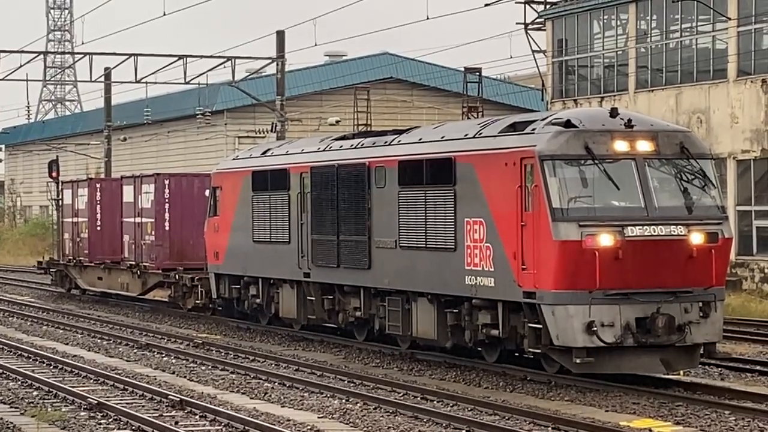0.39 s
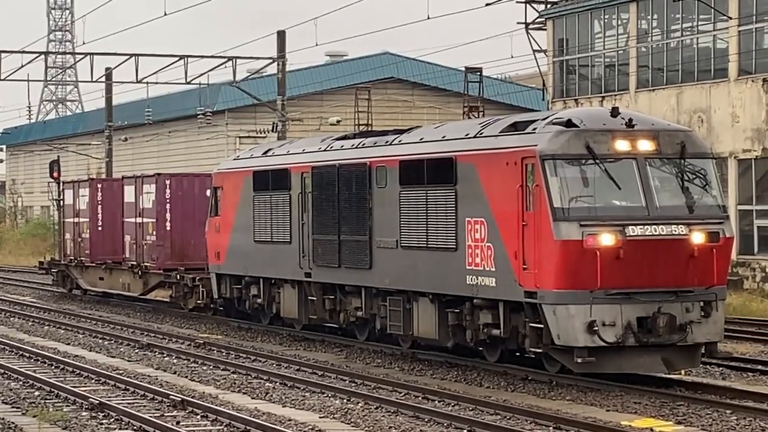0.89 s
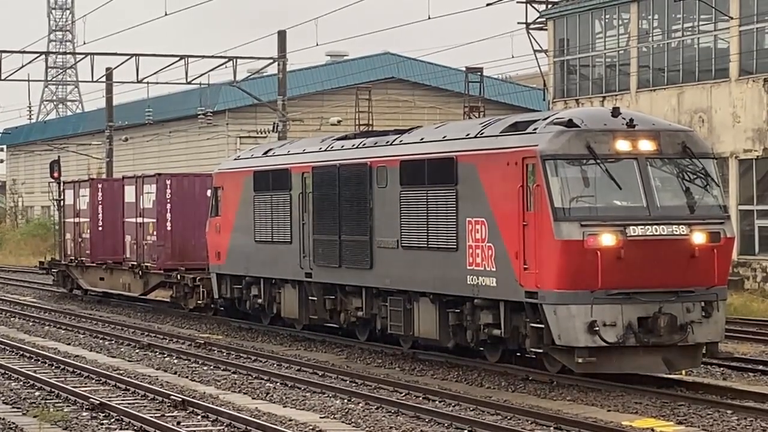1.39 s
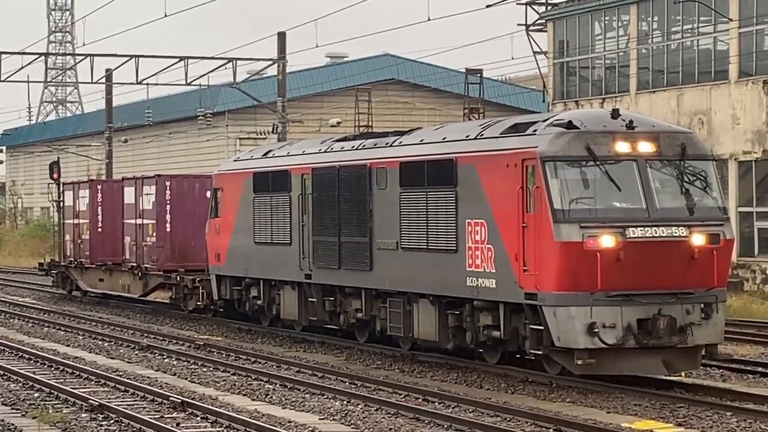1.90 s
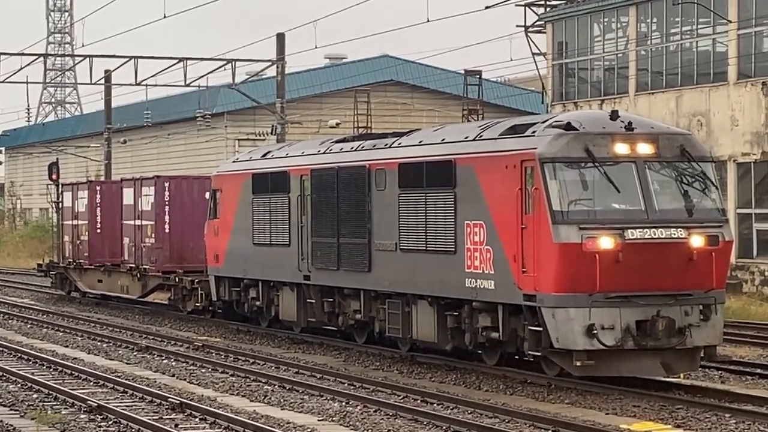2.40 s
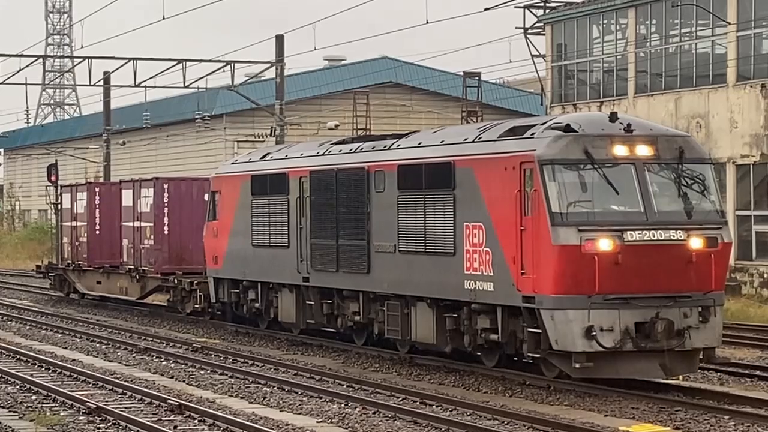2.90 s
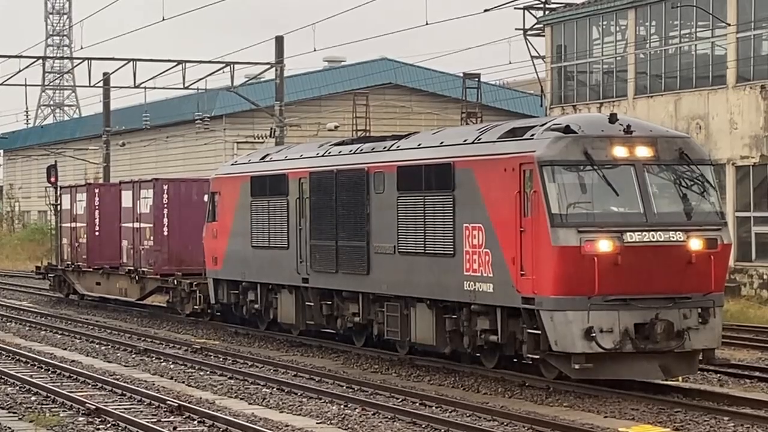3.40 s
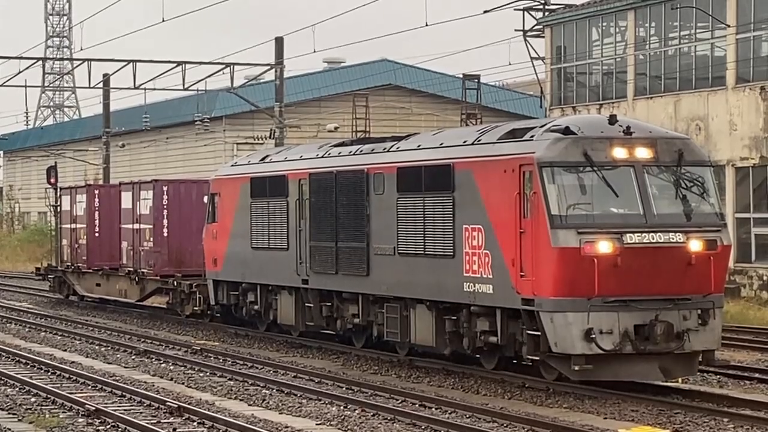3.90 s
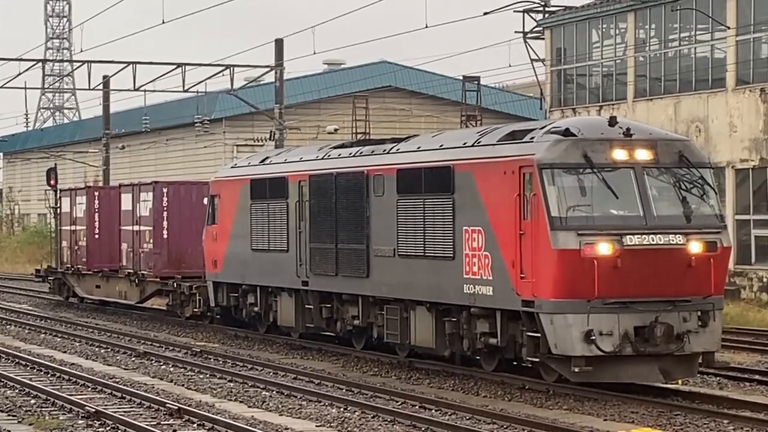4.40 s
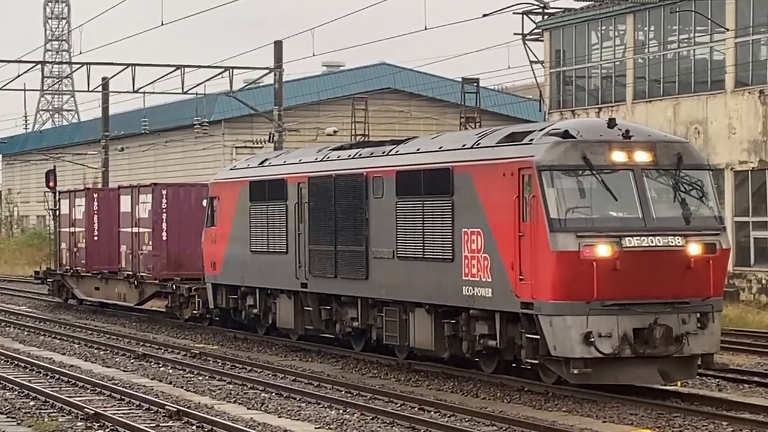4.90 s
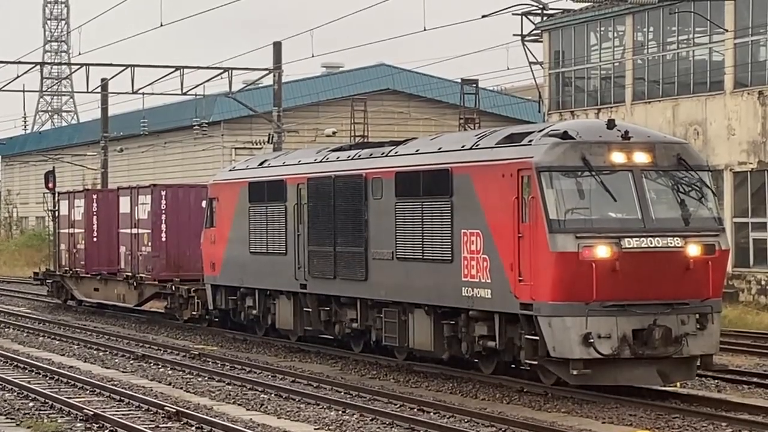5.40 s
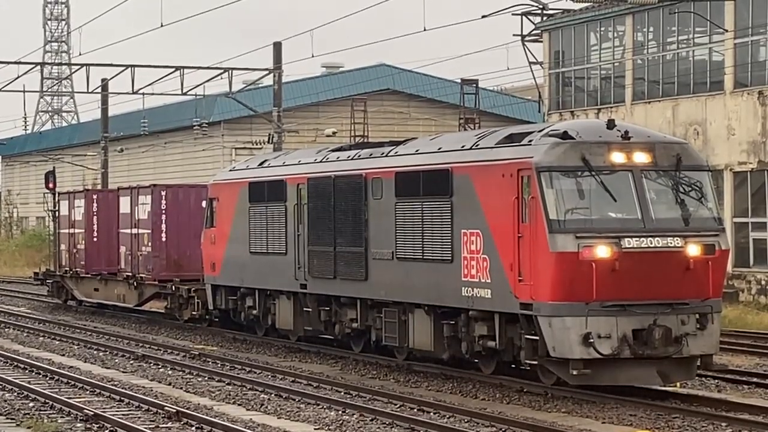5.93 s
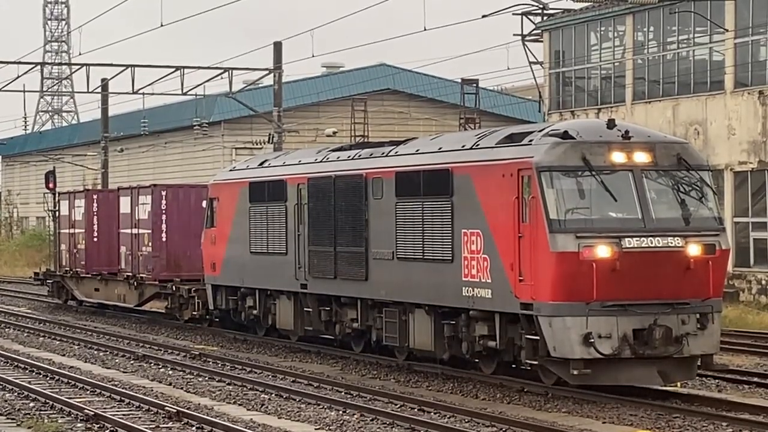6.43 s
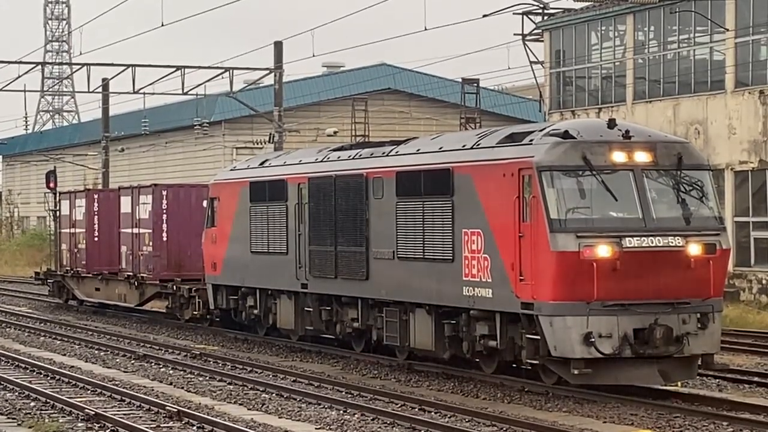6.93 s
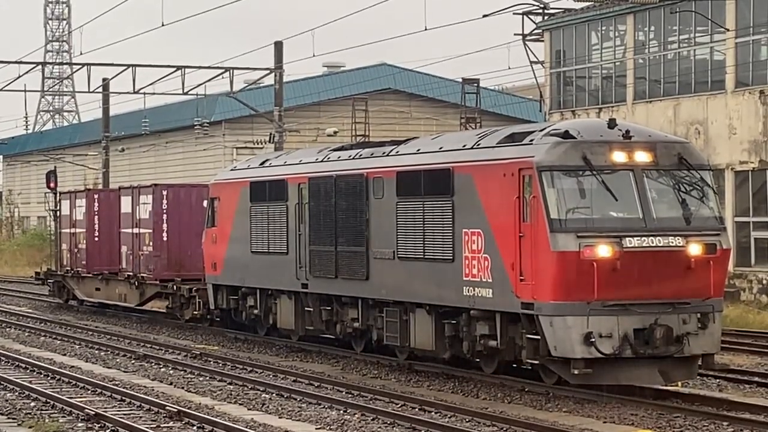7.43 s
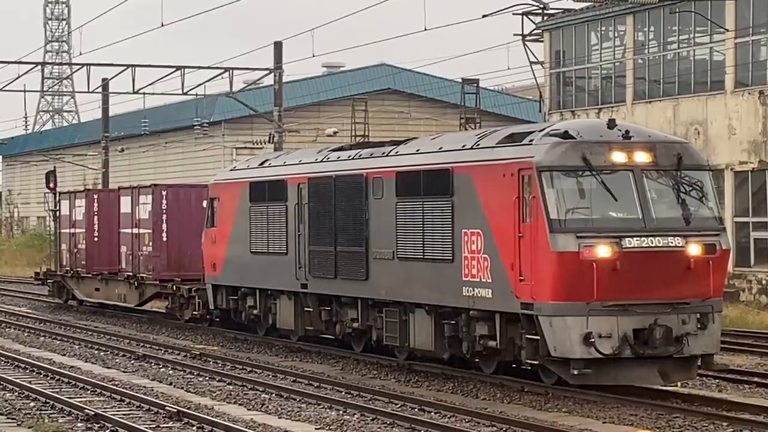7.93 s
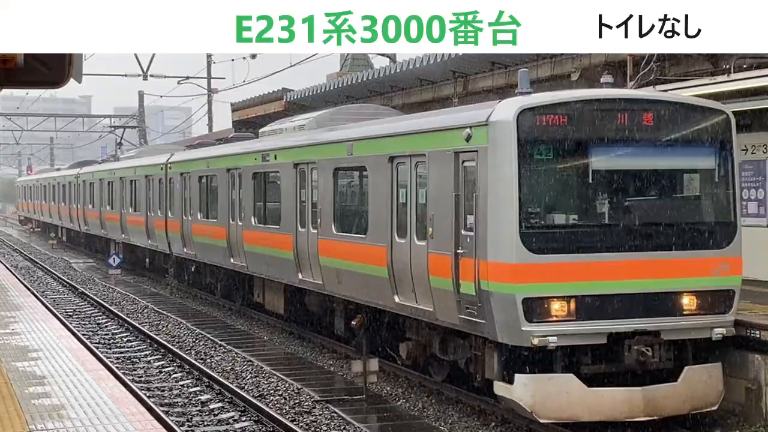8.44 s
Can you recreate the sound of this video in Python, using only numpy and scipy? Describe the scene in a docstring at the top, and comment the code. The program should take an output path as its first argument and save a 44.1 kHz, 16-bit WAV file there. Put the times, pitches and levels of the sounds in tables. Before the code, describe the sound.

From 0 s a large diesel locomotive idles across an open rail yard, already running and never changing speed. Its deep exhaust drone throbs rapidly and evenly, with a rough metallic buzz from the block and quick, slightly uneven valve and injector knocks. Around it are broad fan roar, rushing intake air with a fluttering high whistle, fine hiss and a faint thin whine. Low wind rumble comes and goes, with soft thuds on the small stereo microphone near 0, 0.5 and 1.4 s. A low hum rises around 2 s; from 2.1 to 4 s the roar and air swell modestly, then hold. A midrange growl wanders in pitch and strength throughout. The hum strengthens again near 6.5 s and almost vanishes at 7.7 s. At 8.4 s everything cuts sharply to quiet, steady rain on a platform, with no engine.

```python
"""A twelve-cylinder diesel locomotive idles across a rail yard, heard by a small two-port microphone.
From the start, sines on the engine-cycle orders make exhaust drone and buzz, decaying rings the valve knocks;
wandering narrow noise growls, shaped noise is fan, intake, hiss and wind, and sines give a hum and a whine.
The hum rises near 2 s, roar and air swell from 2.1 to 4 s, and the hum nearly vanishes at 7.7 s.
At 8.4 s the scene cuts to quiet rain on a platform, made of shaped noise."""
import sys
import numpy as np
from scipy import signal
from scipy.fft import rfft, irfft, next_fast_len
from scipy.io import wavfile
from scipy.ndimage import uniform_filter1d, map_coordinates

SR = 44100
rng = np.random.default_rng(int(sys.argv[2]) if len(sys.argv) > 2 else 0)


def decibels_to_gain(level_db):
    """Convert a level in decibels to a linear amplitude gain (20 dB per decade)."""
    exponent = np.asarray(level_db, float) / 20
    return 10 ** exponent


def dump(signal):
    """Clip the signal to [-1, 1] and save it as 16-bit WAV at the path in sys.argv[1]."""
    limited = np.clip(np.atleast_2d(signal).T, -1, 1)
    pcm = np.round(limited * 32767).astype(np.int16)
    wavfile.write(sys.argv[1], SR, pcm)


N = 377496

CYCLE_HZ = 7.0844  # engine cycles a second: a four-stroke at 850 rpm
# Exhaust orders. Each row: multiple of the cycle rate, level in dB rms, left-right balance in dB.
EXHAUST_ORDERS = [(6, -33, -1), (7, -45, -1), (9, -38, -1), (10, -35, -1), (11, -32, -3), (12, -20, -1),
                  (13, -33, -2), (14, -33, -1), (15, -23, -1), (16, -40, -2), (17, -52, -2), (18, -48, -2),
                  (19, -50, -1), (20, -50, 0), (21, -44, -2), (22, -51, -3), (24, -54, -2), (25, -53, -2)]
# Strongest orders of the block's buzz. Each row: multiple of the cycle rate, level in dB rms halfway
# through, dB gained from start to end.
BUZZ_ORDERS = [(44, -52, 0), (45, -52, 0), (47, -54, 0), (54, -55, 0), (81, -49, 0), (84, -52, 0),
               (87, -51, 0), (88, -51, 0), (92, -51, 0), (93, -45, 0), (95, -52, 0), (97, -49, 0),
               (99, -51, 0), (100, -49, 0), (102, -50, 0), (103, -54, 0), (105, -41, 0), (109, -47, 0),
               (110, -53, 0), (113, -49, 0), (114, -46, -4), (116, -49, -2), (117, -46, -4), (118, -50, 0),
               (120, -52, 3), (121, -51, 1), (123, -49, 5), (124, -52, 0), (125, -52, 2), (129, -45, 0),
               (131, -52, -3), (132, -46, 5), (135, -53, 3), (136, -52, 6), (138, -46, 4), (141, -52, 6),
               (146, -55, 0), (150, -55, 0), (162, -51, 3), (163, -56, 0), (170, -55, 1), (172, -55, -3),
               (174, -55, -6), (177, -52, -2), (179, -54, 0), (184, -55, 2), (191, -51, -4), (192, -53, 6),
               (195, -55, 0), (199, -53, 0), (200, -52, 2), (201, -55, -3)]
# Left-right likeness of broad sounds. Each row: frequency in Hz, likeness from 0 to 1.
LIKENESS = [(100, .99), (200, 0.8), (350, 0.82), (550, 0.35), (1000, 0.3), (1600, 0.22), (1900, 0.5),
            (2300, 0.97)]


def along(points, hz, column=1):
    """A column of (Hz, ..) points read on a log axis."""
    table = np.array(points)
    return np.interp(np.log(hz + 1), np.log(table[:, 0] + 1), table[:, column])


def curves(rows):
    """One value per sample for each column after the time."""
    seconds, *columns = np.transpose(rows)
    return [np.interp(np.arange(N) / SR, seconds, column) for column in columns]


def wobble(rate):
    """A smooth random curve, rate knots a second."""
    coarse = np.arange(0, N + 64, 64)
    knots = rng.standard_normal(N // 100)
    return np.interp(np.arange(N), coarse, map_coordinates(knots, [coarse * rate / SR]))


def filtered(x, response):
    """x times a complex response of frequency."""
    size = next_fast_len(N + 8192)
    return irfft(rfft(x, size) * response(np.fft.rfftfreq(size, 1 / SR)), size)[..., :N]


def coloured(white, spectrum):
    """White sound of rms 1 given a level in dB per Hz."""
    return filtered(white, lambda hz: decibels_to_gain(along(spectrum, hz)) * np.sqrt(SR / 2))


def spread(pair, alike):
    """Two unrelated sounds mixed into a left and right of the given likeness."""
    turn = lambda hz: np.arccos(np.clip(along(alike, hz), 0, 1)) / 2
    mid, side = filtered(pair, lambda hz: np.array([np.cos(turn(hz)), np.sin(turn(hz))]))
    return np.array([mid + side, mid - side])


def noise(patchy_db, channels=2):
    """White noise with patches of random gain in time and frequency."""
    bins = signal.stft(rng.standard_normal((channels, N)), nperseg=512)[2]
    field = uniform_filter1d(rng.standard_normal(bins.shape[1:]), size=5, axis=0)
    field = uniform_filter1d(field, size=12, axis=1)
    return signal.istft(bins * decibels_to_gain(patchy_db * field / field.std()), nperseg=512)[1][:, :N]


def tones(cycles, orders, lags, unsteady_db, apart, lag_rad=0, gains_db=None):
    """Sines on multiples of the cycle, each a little unsteady and a little different at the two ports."""
    step, half = 8, np.array([[.5], [-.5]])  # low tones are made at an eighth of the rate
    slow = cycles[::step]
    out = np.zeros((2, len(slow)))
    gains_db = np.zeros(len(orders)) if gains_db is None else gains_db
    for (order, db, pan_db), lag, gain_db in zip(orders, lags, gains_db):
        skew = half * (2 * apart * rng.uniform(-1, 1) * np.sqrt(3) - lag_rad)
        level_db = db + gain_db * (slow / slow[-1] - .5) + unsteady_db * wobble(2.573)[::step]
        level = decibels_to_gain(level_db) * decibels_to_gain(half * pan_db)
        out += np.sqrt(2) * level * np.cos(2 * np.pi * (order * slow + lag) + skew)
    return signal.resample_poly(out, step, 1, axis=1, padtype="line")[:, :N]


def crank():
    """Engine cycles passed; the governor lets the angle drift a hair."""
    return CYCLE_HZ * np.arange(N) / SR + .0006 * wobble(2)


def exhaust_drone(cycles):
    """Exhaust orders of one pulse, which the stack spreads into a short sweep."""
    orders = np.array(EXHAUST_ORDERS)[:, 0]
    lags = .11 * (orders - 13) ** 2 - .31  # in turns
    lags = lags + np.isin(orders, (9, 10, 16)) * .58  # these beside the main group swing against it
    return tones(cycles, EXHAUST_ORDERS, lags, unsteady_db=.7, apart=.1)


def block_buzz(cycles):
    """Strong orders phased as one blow per firing, with a random scatter of phase that softens the blows."""
    # How hard each cylinder strikes the block, in firing order: level in dB.
    firing_db = [2, -8, 4, 0, 2, 2, 6, -10, 2, -4, 4, 8]
    # Where the buzz stands between the ports. Each row: frequency in Hz, left-right balance in dB.
    side = [(300, -6.5), (600, 1.5), (700, 5), (740, -11.5), (820, -7), (870, -3.5), (950, -2.5),
            (1200, -8.5), (1400, -0.5)]
    # Neighbouring orders of one panel swell together once a cycle.
    # Each row: first order, last order, place in the cycle from 0 to 1.
    panels = [(162, 163, 0), (177, 179, 0), (191, 192, .25), (199, 201, .73)]
    orders = np.array(BUZZ_ORDERS)[:, 0]
    places = .06 + np.arange(12) / 12  # of the firings in the cycle
    # the two banks push opposite ways, hence the shift by six orders
    blows = decibels_to_gain(np.array(firing_db)) * np.exp(-2j * np.pi * (orders[:, None] - 6) * places)
    scatter_turns = .125 * rng.standard_normal(len(orders))
    lags = np.angle(blows.sum(axis=1)) / (2 * np.pi) + scatter_turns
    for first, last, place in panels:
        together = lags[orders == first] - (orders - first) * place
        lags = np.where((orders >= first) & (orders <= last), together, lags)
    placed = [(order, db, along(side, order * CYCLE_HZ)) for order, db, gain_db in BUZZ_ORDERS]
    gains_db = np.array(BUZZ_ORDERS)[:, 2]
    # the lag lets the buzz reach the right port first
    return tones(cycles, placed, lags, unsteady_db=1.1, apart=.32, lag_rad=.5, gains_db=gains_db)


def knock(cycles):
    """Twelve combustion blows, each with a ring of its own, repeat in every cycle and slowly change."""
    # Colour of block and body panels before the chug. Each row: frequency in Hz, level in dB per Hz.
    colour = [(150, -64), (300, -66), (440, -63), (520, -66.5), (620, -61), (850, -61), (980, -61),
              (1080, -66.5), (1250, -66), (1420, -65), (1530, -68), (1620, -69.5), (1750, -92), (2400, -77),
              (2750, -84.5), (3000, -79.5), (3200, -79.5), (3600, -130)]
    size, count = 6144, 12  # samples in the stored cycle, blows in it
    since = np.arange(size) % (size // count) / (size // count)
    strength = np.repeat(decibels_to_gain(1.2 * rng.standard_normal(count)), size // count)
    blow = strength * (1 - np.exp(-25 * since)) * np.exp(-2.3 * since)
    orders = rfft(blow * rng.standard_normal((4, size)))
    orders = orders / np.sqrt(abs(orders) + 1e-9)  # none stands far above its neighbours
    cycle = irfft(orders)
    played = cycle[:, (cycles % 1 * size).astype(int)] / cycle.std()
    drift = .7 * (cycles / cycles[-1] - .5) + .1 * wobble(1)  # radians between two sets of rings
    played = np.cos(drift) * played[:2] + np.sin(drift) * played[2:]
    chug = 1 + .15 * np.cos(4 * np.pi * (cycles - .45))  # the blows swell once a crank turn
    return spread(coloured(played * chug, colour), LIKENESS)


def clatter(cycles):
    """Valves and injectors ring at their places in the cycle, a little harder or softer every time."""
    # Each row: place in the cycle from 0 to 1, ring in Hz, level in dB ahead of attack and decay,
    # time to decay by 60 dB in seconds.
    parts = [(.17, 1360, -27, .08), (.23, 440, -32, .09), (.34, 1350, -34, .04), (.5, 820, -29, .06),
             (.66, 1420, -28, .08), (.93, 660, -27, .09), (.94, 830, -29, .04), (.94, 1260, -31, .06)]
    attack_s, scatter_db = .004, .8
    out = np.zeros(N)
    for place, hz, db, t60 in parts:
        turns, part = np.divmod(cycles - place + 2, 1)
        since = part / CYCLE_HZ  # seconds since the knock
        each_db = scatter_db * rng.standard_normal(80)[turns.astype(int)]
        decay = decibels_to_gain(db + each_db - 60 * since / t60)
        attack = (1 - np.exp(-since / attack_s)) ** 2
        out += decay * attack * np.sin(2 * np.pi * hz * since)
    return out


def weaker_orders(x):
    """What lies between the strong orders, which the drone and buzz play."""
    strong = [row[0] for row in EXHAUST_ORDERS + BUZZ_ORDERS]
    return filtered(x, lambda hz: ~np.isin(np.round(hz / CYCLE_HZ), strong))


def growl():
    """Narrow noise around a wandering pitch, swelling and sinking."""
    # Each row: time in seconds, centre in Hz and level in dB before their random wander.
    path = [(0, 255, -51), (1.2, 265, -49), (1.75, 290, -42), (2.05, 320, -43.5), (2.5, 280, -49.5),
            (2.9, 275, -49), (3.2, 280, -45), (3.4, 312, -43), (3.55, 290, -49), (3.72, 255, -41.5),
            (4.05, 315, -46), (4.35, 316, -41.5), (4.7, 300, -46), (5.2, 300, -48.5), (6.2, 300, -42),
            (7.2, 310, -45), (8.4, 290, -45)]
    hz, level_db = curves(path)
    angle = 2 * np.pi * np.cumsum(hz + 12 * wobble(4)) / SR
    narrow = wobble(40) * np.cos(angle) + wobble(40) * np.sin(angle)
    return decibels_to_gain(level_db + 2.2 * wobble(5.9)) * narrow


def swell():
    """The single rise that roar and air share, from 0 at 2.1 s to 1 at 4 s."""
    return np.clip((np.arange(N) / SR - 2.1) / (4 - 2.1), 0, 1)


def roar():
    """Fans and combustion: broad noise that swells once."""
    # Colour before the swell. Each row: frequency in Hz, level in dB per Hz.
    colour = [(90, -88), (140, -78), (170, -65), (215, -68.5), (310, -62), (400, -67.5), (510, -68.5),
              (800, -68.5), (1100, -73), (1400, -69.5), (1800, -74), (2400, -82), (3300, -130)]
    level_db = -0.5 + 2 * swell() + 0.67 * wobble(3.93)
    return spread(coloured(noise(patchy_db=1.0), colour), LIKENESS) * decibels_to_gain(level_db)


def throb(cycles):
    """The beat of the air, six times a cycle."""
    return np.cos(2 * np.pi * 6 * cycles)


def air(cycles):
    """Intake and cooling air: throbbing noise that swells once."""
    # Colour before the swell. Each row: frequency in Hz, level in dB per Hz.
    colour = [(1200, -100), (1900, -76), (2600, -76), (3400, -80), (3900, -83), (5000, -83.5),
              (6500, -87.5), (8000, -90.5), (8600, -94), (9500, -130)]
    level_db = -2 + 2.5 * swell() + 0.16 * wobble(1.5) + 0.13 * wobble(5)
    throbbing = (1 + 0.051 * throb(cycles)) * noise(patchy_db=0.88, channels=1)
    return coloured(throbbing, colour) * decibels_to_gain(level_db)


def intake_whistle(cycles):
    """Fluttering noise through two resonances; each cylinder draws its own amount of air."""
    # Each row: time in seconds, level in dB over the resonances before the flutter.
    level = [(0, -3), (.5, -0.5), (1.15, -5.5), (1.7, 0), (2.9, -1.5), (3.45, 1.5), (3.9, -2.5), (4.2, 2.5),
             (4.55, -2.5), (4.8, 1), (5.6, 0), (6.5, -0.5), (7.4, 1), (8.4, -2)]

    def resonances(hz):
        low = decibels_to_gain(-71.0) / (1 + ((hz - 2965) / 100) ** 2)
        high = decibels_to_gain(-78.0) / (1 + ((hz - 3110) / 140) ** 2)
        return np.sqrt(SR / 2) * (low + high)

    gulps_db = 1.3 * rng.standard_normal(12)[(cycles % 1 * 12).astype(int)]
    flutter = decibels_to_gain(curves(level)[0] + gulps_db + 1.5 * wobble(60)) * (1 + 0.089 * throb(cycles))
    return filtered(flutter * noise(patchy_db=1.0, channels=1), resonances)


def hiss():
    """Treble hiss that rises and falls, a little wide between left and right."""
    # Each row: time in seconds, level in dB added to the colour, before a slight wobble.
    level = [(0.1, -62), (2.56, -62), (3.09, -63.5), (3.55, -59), (3.78, -62), (3.93, -58), (4.54, -61),
             (6.1, -61), (6.88, -59), (7.02, -61), (7.93, -61), (8.35, -62)]
    # Relative colour. Each row: frequency in Hz, level in dB per Hz.
    colour = [(7000, -70), (8600, -33), (9500, -32), (11000, -35.5), (12500, -39), (14000, -43),
              (14600, -51), (15500, -69)]
    treble = coloured(spread(noise(patchy_db=1.5), [(9000, 0.8)]), colour)
    return treble * decibels_to_gain(curves(level)[0] + 0.45 * wobble(8))


def auxiliaries():
    """A wavering hum with its octave, and a thin whine, all sines."""
    # Hum. Each row: time in seconds, level in dB rms.
    hum_level = [(0, -38), (1.6, -37), (2.3, -28), (4.3, -34), (6.5, -29.5), (7.7, -61), (8.4, -41)]
    # Whine. Each row: time in seconds, level in dB rms.
    whine_level = [(0, -50.5), (.9, -55), (3.2, -56.5), (5.8, -53), (6.5, -55), (8.4, -60)]
    hum_hz, whine_hz = 97.3, 1879.3
    t = np.arange(N) / SR
    angle = 2 * np.pi * hum_hz * t - 1 + .3 * wobble(2)
    hum = decibels_to_gain(curves(hum_level)[0]) * np.cos(angle)
    octave = decibels_to_gain(-67 + 2.3 * wobble(2.05)) * np.cos(2 * angle)
    whine = decibels_to_gain(curves(whine_level)[0]) * np.cos(2 * np.pi * whine_hz * t + 0.55 * wobble(3.6))
    return np.sqrt(2) * (hum + octave + whine)


def rumble():
    """Wind and ground rumble: low noise, the same on both sides, that rises and falls in gusts."""
    # Colour before the gusts. Each row: frequency in Hz, level in dB per Hz.
    colour = [(13, -80), (30, -60), (45, -46), (68, -43), (82, -48), (105, -55), (140, -62), (200, -70),
              (300, -90), (500, -130)]
    # Each row: time in seconds, gain in dB.
    gusts = [(0, 6.5), (.9, -3), (1.4, 7), (2.4, -3.5), (3.4, 3), (3.8, -2.5), (4.6, 3.5), (5, -6),
             (5.85, 2), (6.3, 3), (7.35, 4), (7.75, -4), (8.2, -0.5)]
    return coloured(spread(noise(patchy_db=0.5), [(60, 1.0)]), colour) * decibels_to_gain(curves(gusts)[0])


def wind_thuds():
    """Short low thuds of wind on the ports: noise under bell-shaped swells."""
    # Each row: centre in seconds, level in dB added to the colour, half length in seconds.
    thuds = [(0.033, -34, 0.051), (0.553, -31, 0.06), (1.3, -36, 0.093), (1.5, -41, 0.086),
             (7.48, -42, 0.065)]
    # Relative colour. Each row: frequency in Hz, level in dB per Hz.
    colour = [(40, -120), (70, -60), (115, -12), (150, -17.5), (200, -29), (320, -65.5), (500, -120)]
    t = np.arange(N) / SR
    shape = sum(decibels_to_gain(db) * np.exp(-((t - s) / half_s) ** 2) for s, db, half_s in thuds)
    return shape * coloured(rng.standard_normal(N), colour)


def rain():
    """Quiet rain on a platform: steady broad noise."""
    # Colour. Each row: frequency in Hz, level in dB per Hz.
    colour = [(30, -70), (80, -64), (200, -66.5), (500, -69), (1500, -75.5), (4000, -83.5), (8000, -92),
              (12000, -96), (15000, -100), (16000, -125)]
    return coloured(spread(noise(patchy_db=1.0), LIKENESS), colour)


def ports(x):
    """Balance and phase between left and right, by frequency."""
    # Each row: frequency in Hz, left-right balance in dB, turns by which the right leads.
    offsets = [(60, -1, 0), (300, -2, 0), (450, 0, .06), (700, -4.5, .15), (1000, -4, .1), (1500, -1, .05),
               (2000, 0, 0), (2600, 0, 0), (2950, 0, -.055), (3350, 0, -.045), (3480, 0, 0)]
    # Further phase, in the treble. Each row: frequency in Hz, turns by which the right leads.
    treble_turns = [(7350, 0), (9020, .5), (10900, 1), (11700, 1.05), (13100, 1.5), (14900, 2)]
    half = np.array([[.5], [-.5]])

    def response(hz):
        turns = along(offsets, hz, column=2) + along(treble_turns, hz)
        return decibels_to_gain(half * along(offsets, hz)) * np.exp(-2j * np.pi * half * turns)

    return filtered(x, response)


def scene():
    """The yard until the cut, then rain."""
    cycles = crank()
    strong = exhaust_drone(cycles) + block_buzz(cycles)  # already placed between the ports
    engine = weaker_orders(knock(cycles) + clatter(cycles)) + growl()
    rush = roar() + air(cycles) + intake_whistle(cycles) + hiss()
    wind = rumble() + wind_thuds()
    yard = strong + ports(engine + rush + auxiliaries() + wind)
    after = np.clip((np.arange(N) / SR - 8.405) / 0.0025, 0, 1)  # cut at 8.405 s, over 2.5 ms
    return (1 - after) * yard + after * ports(rain())


def roll_off(x):
    """The treble ends steeply here."""
    return signal.sosfilt(signal.butter(12, 15140, fs=SR, output="sos"), x)


def record(dry):
    """The finished mix as it is stored."""
    return roll_off(dry)


dry = scene()
out = record(dry)
dump(out)
```